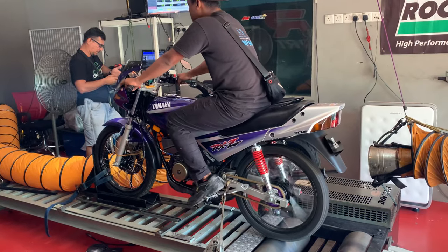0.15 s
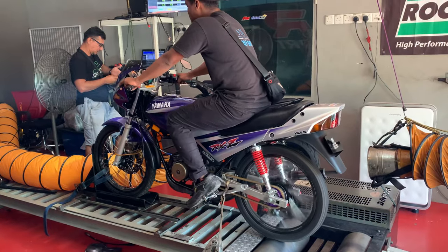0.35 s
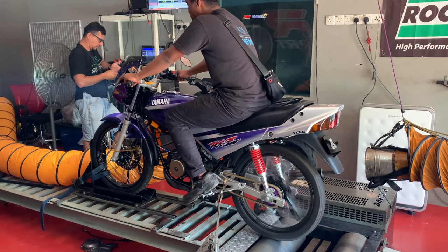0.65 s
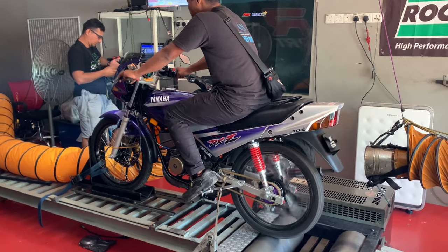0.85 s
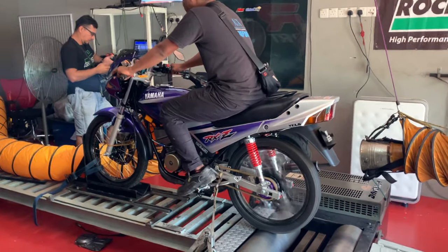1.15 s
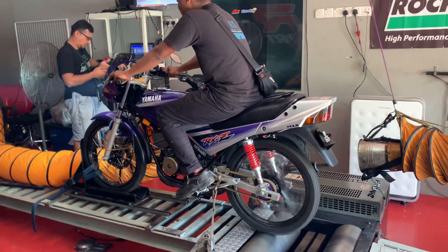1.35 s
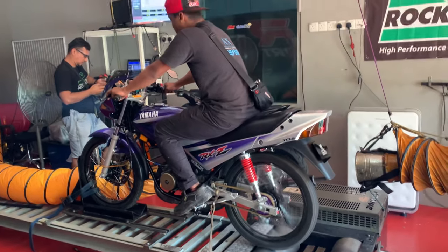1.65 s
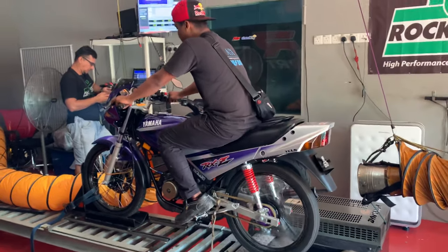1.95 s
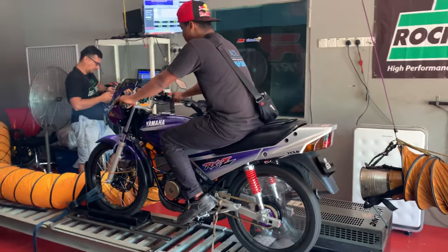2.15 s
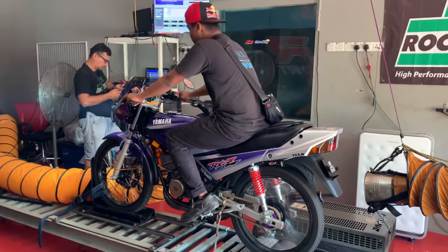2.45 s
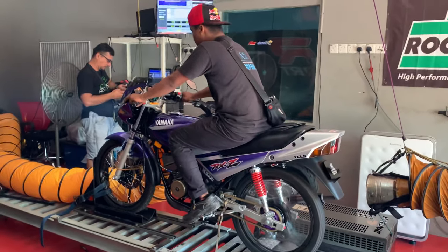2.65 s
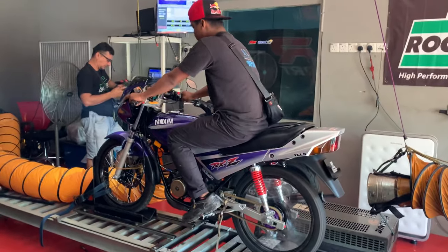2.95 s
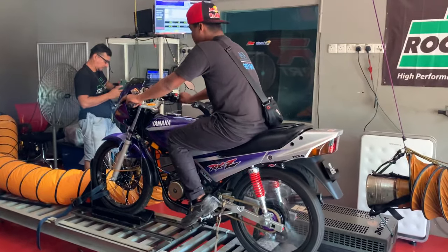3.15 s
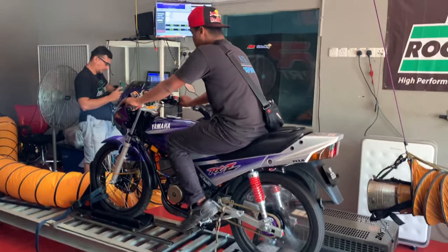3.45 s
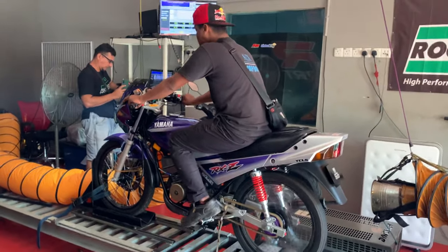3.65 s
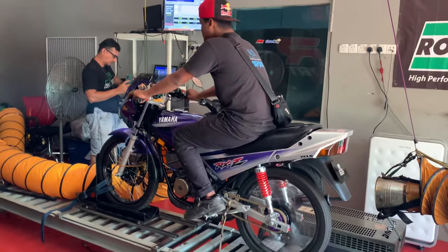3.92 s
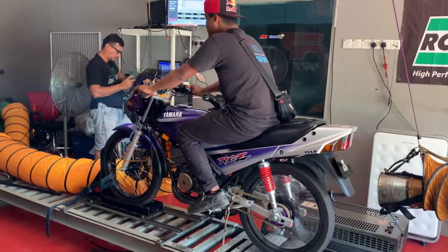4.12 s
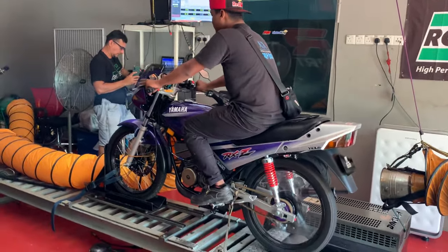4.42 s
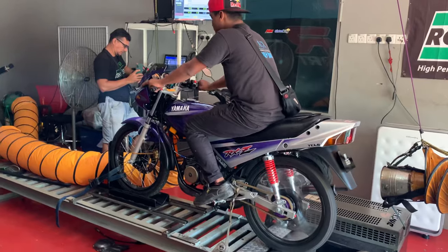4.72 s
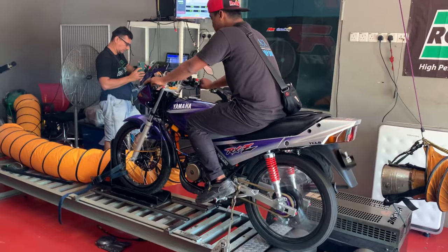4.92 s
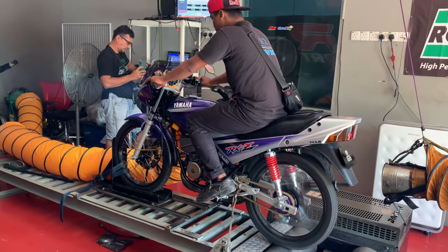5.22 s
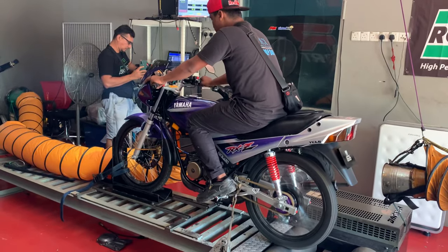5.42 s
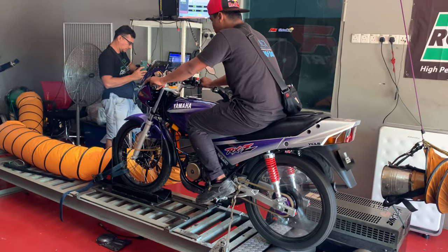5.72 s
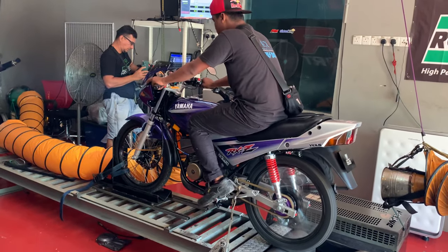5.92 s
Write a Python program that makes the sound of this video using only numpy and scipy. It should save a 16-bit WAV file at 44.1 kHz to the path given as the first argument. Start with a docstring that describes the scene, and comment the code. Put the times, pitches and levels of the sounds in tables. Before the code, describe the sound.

A small two-stroke motorcycle engine pulls at full throttle in a hard-walled workshop, climbing from metallic rattle to rasp, shifting up once, then climbing again.

```python
"""In a hard-walled workshop a small two-stroke motorcycle pulls at full throttle on a dynamometer.
It rattles and rings at low revs, hardens into a rasp as the expansion chamber comes on song,
shuts off for one upshift and climbs again. Tones and spikes locked to the crank make the exhaust;
decaying waves and noise make the chamber's ring; shaped noise makes the gas jets, the tyre on its
drum, the cooling blowers and a few dull puffs. Faded noise serves as the walls' answer."""
import sys
import numpy as np
from scipy import signal
from scipy.fft import rfft, irfft, next_fast_len
from scipy.io import wavfile
from scipy.ndimage import uniform_filter1d, map_coordinates

SR = 44100
rng = np.random.default_rng(int(sys.argv[2]) if len(sys.argv) > 2 else 0)


def store_wav(level_fs):
    """Save 16-bit WAV to argv[1]."""
    pcm = np.round(np.clip(np.atleast_2d(level_fs), -1, 1) * 32767)
    wavfile.write(sys.argv[1], SR, pcm.T.astype(np.int16))


N = 267765  # samples

# How hard the engine pulls with the throttle open, told by the level of its gas jet.
# Each row: time in seconds, level in dB.
EFFORT_CURVE = [(0.0, -28.5), (0.35, -31.5), (0.9, -28), (1.2, -30), (1.7, -27.5), (2.1, -31.5),
                (2.25, -30.5), (2.3, -32), (2.45, -32), (2.72, -26.5), (3.42, -26), (3.62, -30.5),
                (4.16, -33), (4.48, -34), (4.85, -31), (5.45, -31.5), (6.07, -33.5)]
CRUISE_DB, MID_HZ = -30, 120  # middling effort, middling firing rate
# the upshift: the throttle shuts, the crank coasts, then the clutch bites and drags it down
SHUT_S, BITE_S = 4.185, 4.362
CLOSE_S, OPEN_S = 0.015, 0.008  # the throttle shuts and snaps open


def amp(db):
    """Decibels to gain."""
    return 10 ** (np.asarray(db) / 20)


def unit(x):
    """Scale to rms 1."""
    return x / np.sqrt(np.mean(x ** 2) + 1e-20)


def along(points, hz):
    """(Hz, value) points read on a log frequency axis."""
    f, v = np.transpose(points)
    return np.interp(np.log(hz + 1), np.log(f), v)


def curves(rows):
    """One value per sample for each column after the time."""
    s, *cols = np.transpose(rows)
    return [np.interp(np.arange(N) / SR, s, c) for c in cols]


def filtered(x, response):
    """x times a response of frequency."""
    m = next_fast_len(N + SR // 2)
    spectrum = rfft(x, m) * response(np.fft.rfftfreq(m, 1 / SR))
    return irfft(spectrum, m)[..., :N]


def coloured(x, spectrum):
    """x shaped by a spectrum, at rms 1."""
    return unit(filtered(x, lambda hz: amp(along(spectrum, hz))))


def bells(rows, x):
    """Sum of bell-shaped bumps in dB; each row holds centre, half width and height in dB."""
    return sum(db * np.exp(-((x - centre) / width) ** 2) for centre, width, db in rows)


def per_firing(turns):
    """A new random value for every firing, joined smoothly."""
    return map_coordinates(rng.standard_normal(int(turns[-1]) + 3), [turns], order=1)


def wobble(rate):
    """A smooth random curve, rate knots a second."""
    return map_coordinates(rng.standard_normal(int(N * rate / SR) + 4), [np.arange(N) * rate / SR])


def steady(x):
    """x at an even rms of 1 from low revs to high; quick swells remain."""
    return x / np.sqrt(np.abs(uniform_filter1d(x ** 2, SR // 2)) + 1e-12)


def patchy(x, depth_db, size=1024):
    """Neighbouring partials swell and fade each on their own, some ten times a second."""
    z = signal.stft(x, nperseg=size)[2]
    across_hz = uniform_filter1d(rng.standard_normal(z.shape), 3, axis=-2)
    field = uniform_filter1d(across_hz, 6, axis=-1)
    gain = unit(amp(depth_db * np.tanh(unit(field) / 2) * 2))
    return signal.istft(z * gain, nperseg=size)[1][..., :N]


def workshop(x, wet_db):
    """Fading noise as the walls' answer: mid is direct sound plus echo, side is echo alone."""
    # How long the echo takes to fade by 60 dB. Each row: frequency in Hz, fade time in seconds.
    fade_times = [(100, 0.071), (500, 1), (2000, 0.59), (6000, 0.2), (12000, 0.026)]
    hz, t, z = signal.stft(rng.standard_normal((2, SR // 2)), SR, nperseg=256)
    fade_db = -60 * t / along(fade_times, hz)[:, None]
    tail = signal.istft(z * amp(fade_db), SR, nperseg=256)[1]
    tail = tail / np.linalg.norm(tail[0])
    front, sideways = signal.fftconvolve(x[None], tail, axes=1)[:, :N]
    wet = amp(wet_db)
    return np.array([(x + wet * front) / np.hypot(1, wet), sideways])


def revs():
    """Firing rate in Hz: a climb, a short coast, a quick drop as the clutch bites, another climb."""
    # Firing rate in the lower and in the higher gear, one bang per turn of the crank.
    # Each row: time in seconds, firing rate in Hz.
    first_pull = [(0.0, 60.6), (0.34, 67.3), (0.6, 73.4), (0.72, 76), (0.88, 80.1), (1.34, 87.7),
                  (1.68, 94.6), (1.87, 96.2), (1.95, 99.1), (2.17, 103), (2.25, 105.6), (2.5, 111.5),
                  (2.78, 123), (3.01, 135.8), (3.2, 149.1), (3.52, 170.2), (3.8, 182.8), (4.0, 187.1),
                  (4.17, 190.3)]
    second_pull = [(4.46, 138.2), (4.97, 154.2), (5.08, 157), (5.14, 159.6), (5.54, 172), (5.85, 179.3),
                   (6.07, 183.9)]
    coast_hz_per_s, clutch_s = 20, .055
    t = np.arange(N) / SR
    coasting = curves(first_pull)[0] - coast_hz_per_s * np.maximum(t - SHUT_S, 0)
    # a third of the clutch's travel lies ahead of the bite
    engaged = np.clip((t - BITE_S) / clutch_s + 1 / 3, 0, 1)
    return (1 - engaged) * coasting + engaged * curves(second_pull)[0]


def throttle_shut():
    """0 at full throttle, 1 while it is shut for the upshift."""
    return np.interp(np.arange(N) / SR, [SHUT_S, SHUT_S + CLOSE_S, BITE_S, BITE_S + OPEN_S], [0, 1, 1, 0])


def stumble():
    """1 once the clutch has bitten, falling to 0 as the pipe comes back into tune."""
    ragged_s = 0.055  # the burning stays ragged this long, and takes as long again to clear
    times = [BITE_S, BITE_S + OPEN_S, BITE_S + ragged_s, BITE_S + 2 * ragged_s]
    return np.interp(np.arange(N) / SR, times, [0, 1, 1, 0])


def strength(voice):
    """Level of one voice in dB, from effort, revs and the upshift."""
    # How loud each voice is. Each row: level in dB at middling effort and revs, dB per dB of effort,
    # dB per octave of revs, share of the throttle dip (1 is the full dip), change in dB in the stumble.
    voice_levels = { "pipe": (-31, 0.86, -5.5, 0.2, 0), "rasp": (-25, 0.74, -0.5, 1.6, -1.5),
                    "ring": (-23, 0.94, -0.5, 0, -2.5), "jet": (-30, 0.87, 0.5, 1.5, 0.5),
                    "first order": (-2.5, 1, 1.3, 1.5, -8), "second order": (0, 0.2, 0, 1.3, -10), }
    shut_db, coast_db_per_s = -3.5, -20  # drop as the throttle shuts, and the fade after it
    base_db, per_effort, db_per_octave, dip_share, stumble_db = voice_levels[voice]
    effort_db = curves(EFFORT_CURVE)[0] - CRUISE_DB
    dip_db = throttle_shut() * (shut_db + coast_db_per_s * (np.arange(N) / SR - SHUT_S))
    shift_db = dip_share * dip_db + stumble_db * stumble()
    return base_db + per_effort * effort_db + db_per_octave * np.log2(revs() / MID_HZ) + shift_db


def bursts(turns, decay_turns, rest, scatter_db):
    """Mid and side noise that flares as the exhaust port opens and dies within the turn."""
    flare = np.exp(-(turns % 1) / decay_turns) * amp(scatter_db * per_firing(np.floor(turns)))
    return unit((flare + rest) * rng.standard_normal((2, N)))


def pulses(turns, rough, ring_share, jitter_turns, scatter_db, count=100):
    """One uneven pressure spike per firing, made of orders (multiples of the firing rate) from 3 up."""
    late = jitter_turns * rough * per_firing(turns)
    half = np.pi * ((turns + late) % 1) + 1e-9
    # a closed form for the sum of equal cosines from order 3 to order count
    spikes = (np.sin((2 * count + 1) * half) - np.sin(5 * half)) / np.sin(half)
    # the third order is weak until the chamber is in tune
    spikes = spikes - 1.7 * ring_share * np.cos(6 * half)
    return spikes * amp(scatter_db * rough * per_firing(turns))


def boom(turns, rough, flutter_share=0.33, waver=0.1):
    """The two lowest orders swell through the room's standing waves and flutter with ragged burning."""
    # Loudness of a low order before its voice level. Each row: frequency in Hz, level in dB.
    low_spectrum = [(60, -57), (75, -37), (130, -38.5), (200, -37), (290, -32), (380, -30)]
    # Standing waves of the workshop that lift or cancel a low order as it sweeps through.
    # Each row: centre in Hz, half width in Hz, change in dB.
    room_waves = [(87, 2.2, 8), (100.4, 1.6, -10), (106.6, 2.4, 4), (142.7, 3.6, 7), (159.4, 3, 8.5),
                  (171.8, 2.6, -15), (183.5, 11.6, 7.5), (213, 15, -4.5), (232, 6.1, 6.5), (272, 5, 7),
                  (274.5, 2.4, -18), (330.3, 7, 8.5), (342.4, 1.9, -19), (380, 3.5, 2)]
    swell_db, swell_rate = 2 + 2 * throttle_shut(), 26  # the rate in knots a second
    tones = 0
    for order, voice in enumerate(["first order", "second order"], 1):
        order_hz = order * revs()
        room_db = along(low_spectrum, order_hz) + bells(room_waves, order_hz)
        level_db = strength(voice) + room_db + swell_db * wobble(swell_rate)
        tones = tones + amp(level_db) * np.exp(2j * np.pi * order * turns)
    flutter = (waver + flutter_share * rough ** 2) * (per_firing(turns) + 1j * per_firing(turns))
    tones = np.sqrt(2) * tones * (1 + flutter)
    return np.array([tones.imag, tones.real])


def through_pipe(x):
    """x rings in pipe and workshop; near surfaces scatter each band's arrival a little."""
    # What passes between the resonances. Each row: frequency in Hz, level in dB.
    pipe_spectrum = [(190, -37.5), (260, -38.5), (400, -35.5), (465, -39.5), (540, -39.5), (600, -42.5),
                     (700, -46), (760, -47), (950, -47.5), (1200, -43), (1500, -42), (1740, -47),
                     (1950, -41.5), (2220, -42.5), (2330, -43.5), (2540, -40.5), (2680, -44.5),
                     (3100, -42.5), (3400, -46), (4100, -44), (4500, -48.5), (9000, -70)]
    # Resonances that the orders sweep through. Each row: centre in Hz, half width in Hz, change in dB.
    hollows = [(196.7, 2.5, 16), (251, 14, 12), (268, 9.7, 4), (290, 5.3, 10), (325, 4.3, 8),
               (373, 11, 3.5), (408.5, 11, 3), (458.5, 0.75, 8.5), (537, 21, 2), (545.8, 7.7, 5.5),
               (595.6, 4.2, 8.5), (628.5, 21.4, 9), (678.4, 27, 8), (724, 7, 3), (800, 6.8, 7.5),
               (834.5, 14, 7), (891, 34, 5.5), (989, 14, 7), (1030.4, 17.4, 8), (1095, 16, 7.5),
               (1160, 36, 2), (1215, 13, 8.5), (1265.4, 21, 10), (1349, 11, 7), (1422, 28, 6.5),
               (1530, 17, -0.5), (1655, 30, 4), (1763, 13, 13), (2200, 35, 4.5), (2255, 22, 7.5),
               (3370, 16, 4.5)]
    smear_s, smear_hz = .0022, 170  # size of the scatter, and how far apart in pitch it changes

    def response(hz):
        db = along(pipe_spectrum, hz) + bells(hollows, hz)
        # folding the cepstrum gives each resonance the phase of a natural ring, with no pre-echo
        cepstrum = irfft(np.log(amp(db)))
        cepstrum[1:] *= 2 * (np.arange(1, len(cepstrum)) < len(cepstrum) // 2)
        knots = rng.standard_normal(int(hz[-1] / smear_hz) + 4)
        delay_s = smear_s * map_coordinates(knots, [hz / smear_hz])
        return np.exp(rfft(cepstrum) - 2j * np.pi * np.cumsum(delay_s) * hz[1])
    return filtered(x, response)


def exhaust(turns, rough, ring_share, roar_db=1):
    """Spikes through the pipe give its note and, in tune, its rasp; ragged burning adds a roar."""
    # Tone of the roar. Each row: frequency in Hz, relative level in dB.
    roar_spectrum = [(25, -34), (55, -7), (100, 2), (270, 4), (470, 4), (650, 4), (800, 0), (1250, 1.5),
                     (1600, 2), (2500, -65)]
    rasp_from_hz = 950
    crackle_db = 1.8  # the rasp's level scatters from firing to firing
    pipe_db, rasp_db = strength("pipe"), strength("rasp")
    spikes = pulses(turns, rough, ring_share, jitter_turns=.007, scatter_db=2.5)
    voiced = through_pipe(spikes)
    low = filtered(voiced, lambda hz: 1 / (1 + (hz / rasp_from_hz) ** 12))
    note = amp(pipe_db) * np.sqrt(1 - rough ** 2) * steady(low)
    crackling = (voiced - low) * amp(crackle_db * per_firing(turns))
    rasp = amp(rasp_db) * np.sqrt(1 - ring_share) * steady(crackling)
    gusts = bursts(turns, decay_turns=0.89, rest=0.57, scatter_db=3.5)
    roar = amp(pipe_db + roar_db) * rough * coloured(gusts, roar_spectrum)
    note_and_roar = patchy(workshop(note, wet_db=-9) + roar, depth_db=3)
    return note_and_roar + patchy(workshop(rasp, wet_db=-3), depth_db=3.5)


def ring(turns, ring_share, shell_db=-8.0):
    """Each bang sends a few steep waves down the chamber and rattles its shell."""
    # A short train of steep pressure waves. Each row: frequency in Hz, relative level in dB.
    shock_partials = [(1900, 6), (3850, 1), (5750, -9.5), (8100, -7.5)]
    # Tone of the rattle. Each row: frequency in Hz, relative level in dB.
    clatter_spectrum = [(900, -48), (1500, -2), (2000, 8), (2700, 17), (4200, 5.5), (5500, 1), (8000, -27)]
    # Spells of harder or softer ringing. Each row: middle in seconds, change in dB, length in seconds.
    ring_spells = [(1.283, 4, 0.14), (1.605, 1, 0.08), (2.343, -3, 0.051), (2.887, -6, 0.052)]
    length_s, wander_s = .001, .00009  # length of a train, and scatter of its arrival
    scatter_db, detune = 1.5, .018  # scatter of its level and, as a fraction, of its pitch
    firing = np.floor(turns)
    age = (turns % 1) / revs() - 2 * length_s + wander_s * per_firing(firing)
    phase = 2 * np.pi * age * (1 + detune * per_firing(firing))
    # all partials crest together, so each wave is a sharp peak
    waves = sum(amp(db) * np.cos(hz * phase) for hz, db in shock_partials)
    shocks = unit(waves * np.exp(-(age / length_s) ** 2) * amp(scatter_db * per_firing(firing)))
    rattle = coloured(bursts(turns, decay_turns=0.33, rest=0.8, scatter_db=3.5), clatter_spectrum)
    level = amp(strength("ring")) * np.sqrt(ring_share)
    t = np.arange(N) / SR
    spell_db = sum(db * np.exp(-((t - s) / length) ** 2) for s, db, length in ring_spells)
    crack = workshop(level * amp(spell_db) * ring_share * shocks, wet_db=-4.5)
    shell = amp(shell_db) * level * np.sqrt(ring_share) * rattle
    return patchy(crack + shell, depth_db=1.5)


def singing(turns, rough, ring_share, sing_db=-9):
    """The firings ring the shell's sharp modes at low revs, each stroke a little differently."""
    # The shell sings when an order meets one of its modes.
    # Each row: frequency in Hz, width in Hz, relative level in dB.
    shell_modes = [(1840, 43, 11.5), (1890, 60, 4), (2020, 60, 1), (3713, 60, 8.5)]
    spikes = pulses(turns, rough, ring_share, jitter_turns=.008, scatter_db=3)

    def modes(f):
        return sum(amp(db) * 1j * f * w / (c * c - f * f + 1j * f * w) for c, w, db in shell_modes)
    level = amp(strength("ring") + sing_db) * ring_share ** 2
    sung = level * workshop(unit(filtered(spikes, modes)), wet_db=-7.5)
    return patchy(sung, depth_db=3)


def hiss(turns):
    """Gas jets from the tailpipe, throbbing a little with the firings; part comes off the walls."""
    # Tone of the jets. Each row: frequency in Hz, relative level in dB.
    jet_spectrum = [(2000, -13), (4000, 3.5), (5200, 5.5), (7000, 5), (7900, 4), (8150, 10), (8500, 3),
                    (9200, 7), (10500, 7), (14000, 3.5)]
    gusts = bursts(turns, decay_turns=1.0, rest=1.0, scatter_db=2.5)
    jet = amp(strength("jet") + 4.0) * coloured(gusts, jet_spectrum)
    echoed = workshop(jet[0], wet_db=35)  # almost all echo
    return .8 * echoed + .58 * jet[::-1]


def roller(surge_db=3.0, surge_rate=7, per_effort=0.91):
    """The tyre rumbles unevenly on the drum, louder with speed and as the engine pulls harder."""
    # Tone of the rumble. Each row: frequency in Hz, relative level in dB.
    rumble_spectrum = [(25, -30), (50, 10), (90, 7), (150, 17.5), (400, -27), (1500, -60)]
    speed_db = np.interp(np.arange(N) / SR, [2, 3.2], [-58, -49])
    effort_db = curves(EFFORT_CURVE)[0] - CRUISE_DB
    level_db = speed_db + per_effort * effort_db + surge_db * wobble(surge_rate)
    return amp(level_db) * coloured(rng.standard_normal((2, N)), rumble_spectrum)


def blowers():
    """The cooling blowers' rush of air: steady shaped noise."""
    # Tone of the blowers. Each row: frequency in Hz, relative level in dB.
    blower_spectrum = [(25, -20), (80, -8), (300, -4), (1000, 6), (3000, 2), (8000, 21), (15000, -20)]
    return amp(-54.5) * coloured(rng.standard_normal((2, N)), blower_spectrum)


def flares(turns, waver=0.12):
    """An order swells out of the note and sinks back, trembling a little from firing to firing."""
    # Single orders ring out as they cross a sharp resonance of the workshop.
    # Each row: middle in seconds, order (multiple of the firing rate), level in dB, length in seconds.
    flare_rows = [(0.805, 20, -27.5, 0.05), (1.0, 4, -30, 0.062), (1.155, 8, -29, 0.15),
                  (1.293, 2, -29, .08), (1.353, 6, -33, .08), (1.82, 6, -37, 0.097), (2.434, 6, -40, .06),
                  (2.68, 16, -24, 0.042), (2.755, 11, -26.5, 0.042), (2.84, 9, -33, .04),
                  (3.0, 15, -26, 0.061), (3.06, 16, -31, 0.036), (3.088, 9, -26, 0.026),
                  (3.16, 14, -32, .04), (3.226, 12, -27, .035), (3.353, 8, -30, 0.046),
                  (3.561, 7, -31, 0.038), (3.718, 7, -33.5, 0.043), (3.94, 3, -35.5, 0.11),
                  (4.1, 12, -31.5, .11), (4.15, 7, -31, .05), (4.16, 9, -33, .04), (4.5, 4, -35, .07),
                  (4.6, 10, -33, .05), (4.84, 10, -33, .04), (4.91, 8, -29, .055), (4.94, 4, -34, 0.061),
                  (5.033, 12, -33, 0.062), (5.493, 15, -31, 0.02), (5.518, 11, -33, 0.047),
                  (5.605, 7, -29, .07)]
    t = np.arange(N) / SR
    tones = np.zeros(N, complex)
    for (s, order, db, length), phase in zip(flare_rows, rng.random(len(flare_rows))):
        near = np.abs(t - s) < 3 * length
        swell = -((t[near] - s) / length) ** 2
        cycles = round(order) * turns[near] + phase
        tones[near] += amp(db) * np.exp(swell + 2j * np.pi * cycles)
    tremble = waver * (per_firing(turns) + 1j * per_firing(turns))
    tones = np.sqrt(2) * tones * (1 + tremble)
    return np.array([tones.imag, tones.real])


def puffs():
    """Now and then a dull puff: low noise that swells and fades."""
    # Each row: middle in seconds, level in dB, length in seconds.
    puff_rows = [(3.13, -40, 0.056), (3.49, -32, 0.028), (5.238, -41, 0.19), (6.05, -26, 0.02)]
    t = np.arange(N) / SR
    swell = sum(amp(db) * np.exp(-((t - s) / length) ** 2) for s, db, length in puff_rows)
    dull = [(25, -22), (70, 3), (130, 2), (350, -13), (1000, -50)]  # Hz, relative dB
    return swell * coloured(rng.standard_normal((2, N)), dull)


def scene():
    """The crank drives every voice of the engine; the bass reaches both ears almost alike."""
    # How ragged the burning is. Each row: time in seconds, roughness from 0 to 1.
    ragged = [(0, 0.7), (.3, 0.25), (.6, 0.5), (1.25, 0.23), (1.55, 0.77), (2.35, 0.25), (3.15, 0.38),
              (3.8, 0.37), (4.15, 0.26), (4.6, 0.29), (5.3, 0.33), (6.07, 0.3)]
    # How wide the sound is. Each row: frequency in Hz, gain of the side signal in dB.
    side_width = [(40, -15), (150, -12.5), (300, -15), (600, -5), (1500, -3.5), (3000, -3.5), (8000, 0.5)]
    shift_rough = 0.08  # roughness added by the upshift
    mid_ring_share, ring_loss_per_hz = 0.53, 0.0046  # metal ring gives way to rasp as revs rise
    rate_hz = revs()
    turns = np.cumsum(rate_hz) / SR
    shifting = np.maximum(throttle_shut(), stumble())
    rough = np.clip(curves(ragged)[0] + shift_rough * shifting, 0, .97)
    ring_share = np.clip(mid_ring_share - ring_loss_per_hz * (rate_hz - MID_HZ), 0, .97)
    engine = boom(turns, rough) + exhaust(turns, rough, ring_share) + ring(turns, ring_share)
    engine = engine + singing(turns, rough, ring_share) + hiss(turns) + flares(turns)
    mid, side = engine + roller() + blowers() + puffs()
    side = filtered(side, lambda hz: amp(along(side_width, hz)))
    # the left channel is set half a dB below the right
    return np.array([mid + side, mid - side]) * amp([[-.25], [.25]])


def record(dry):
    """The recorder keeps nothing above its band limit."""
    top_hz = 14700
    return filtered(dry, lambda hz: hz < top_hz)


dry = scene()
out = record(dry)
store_wav(out)
```